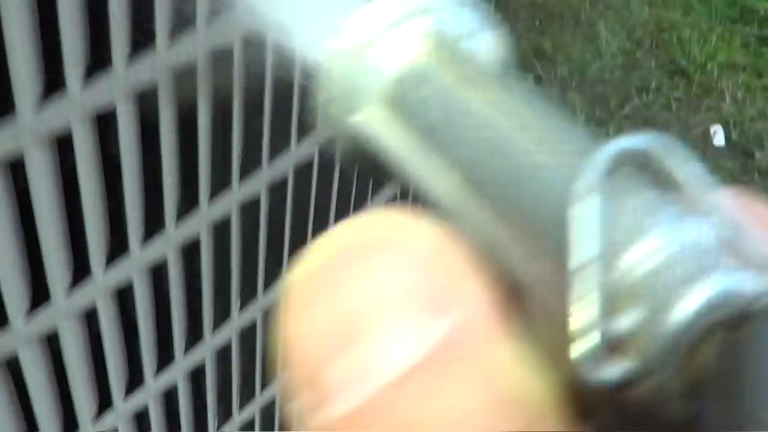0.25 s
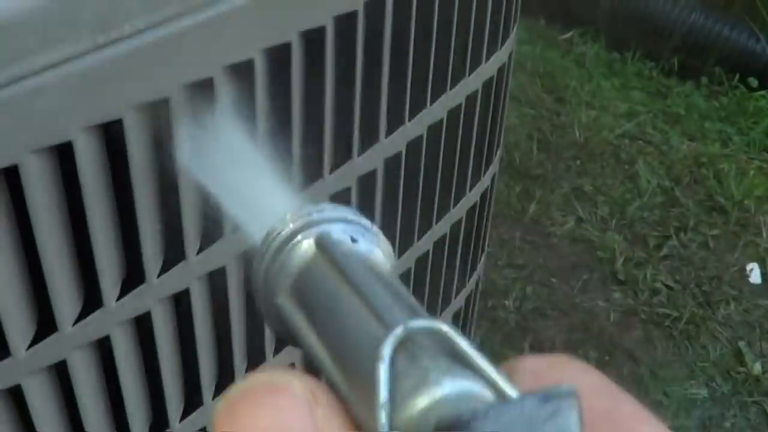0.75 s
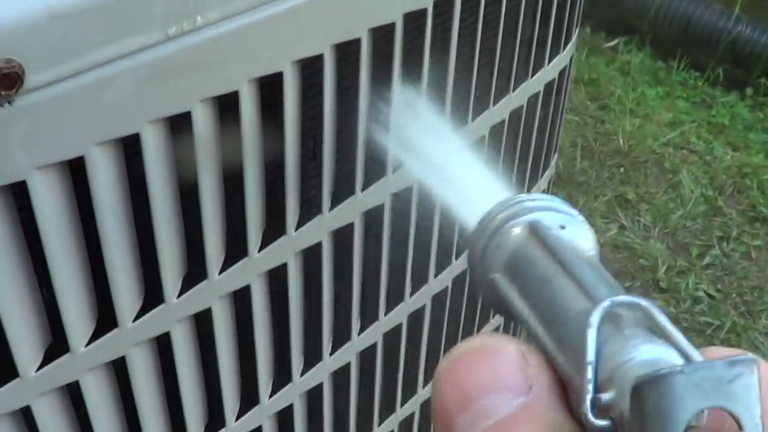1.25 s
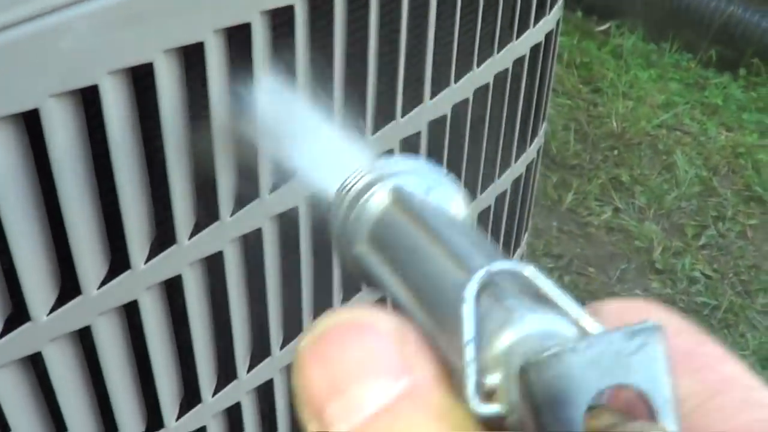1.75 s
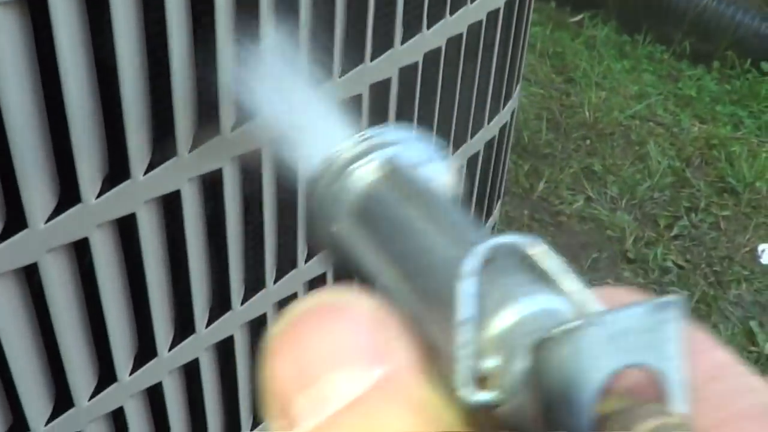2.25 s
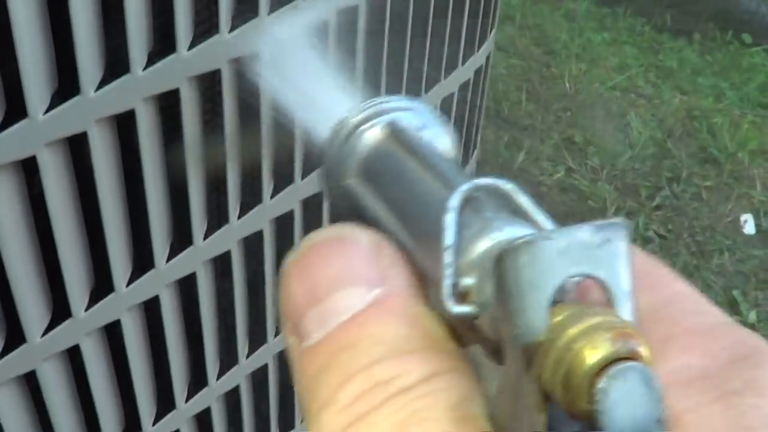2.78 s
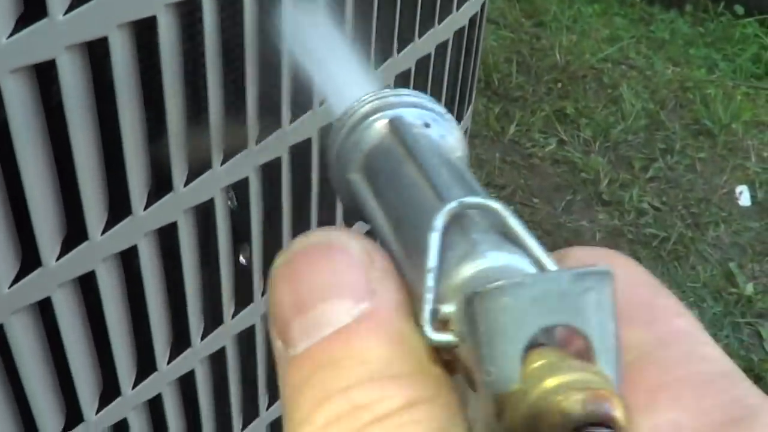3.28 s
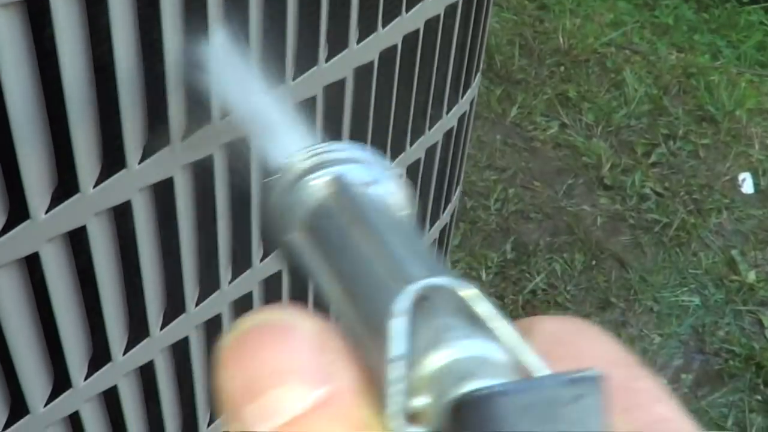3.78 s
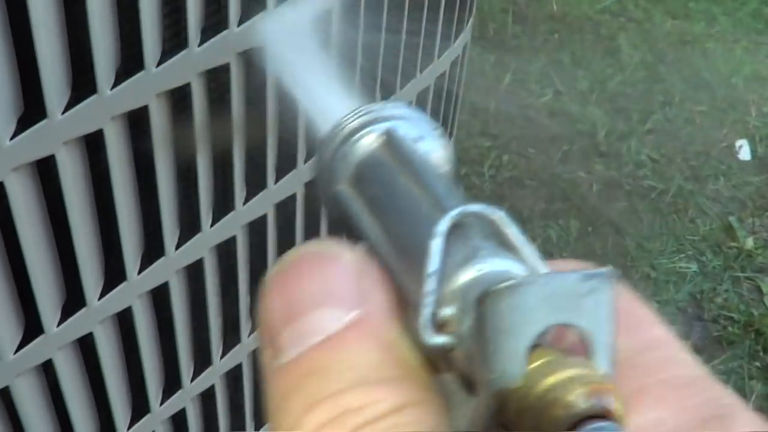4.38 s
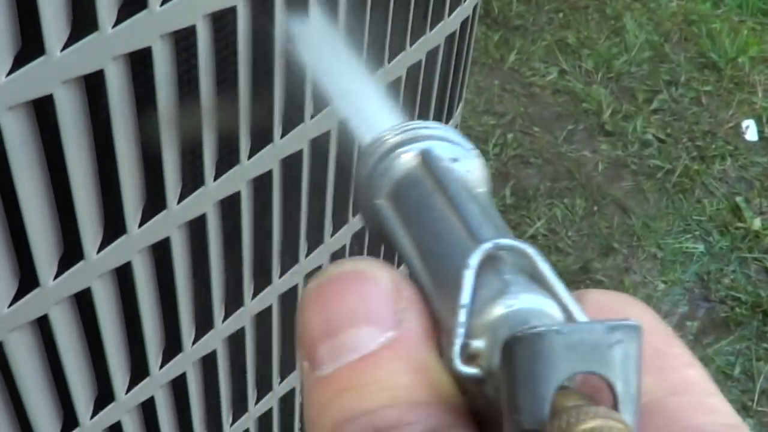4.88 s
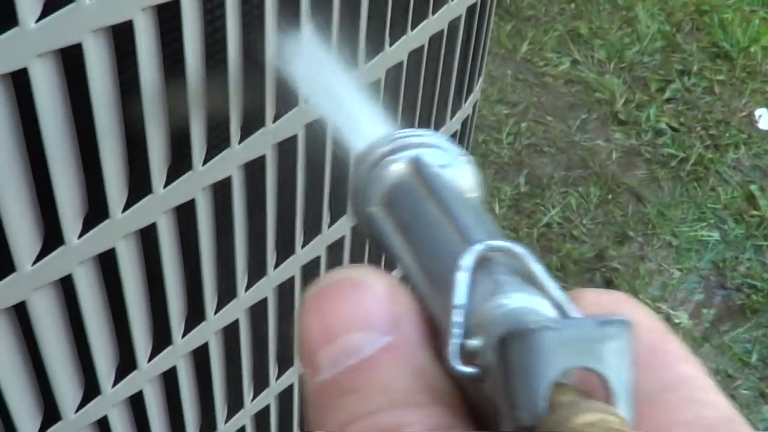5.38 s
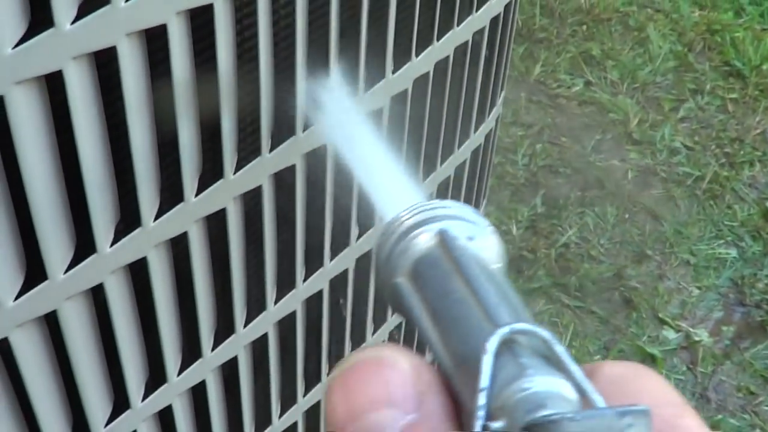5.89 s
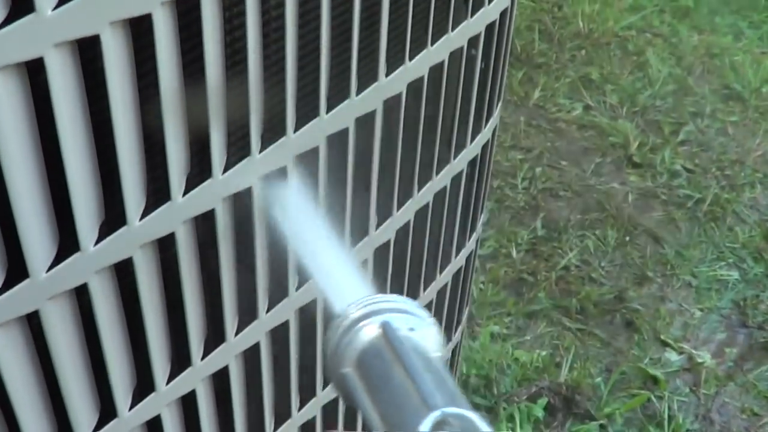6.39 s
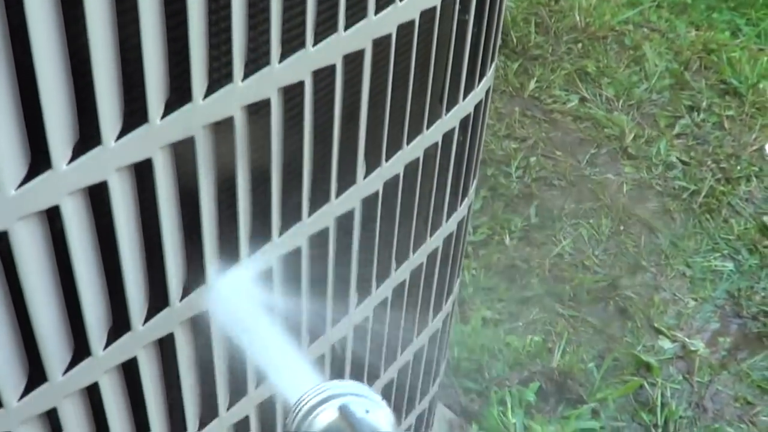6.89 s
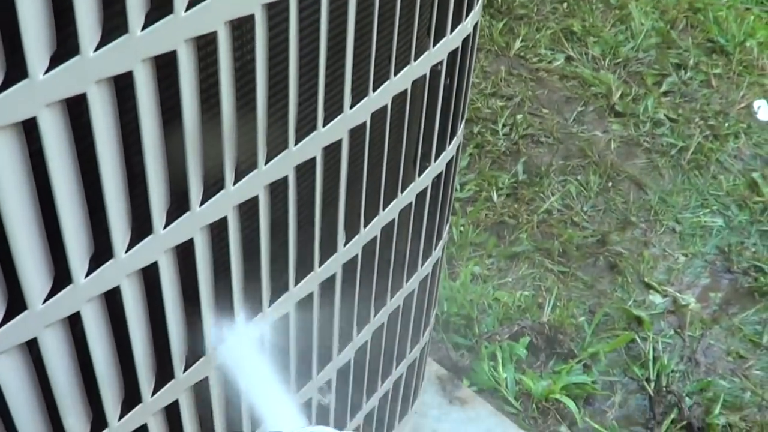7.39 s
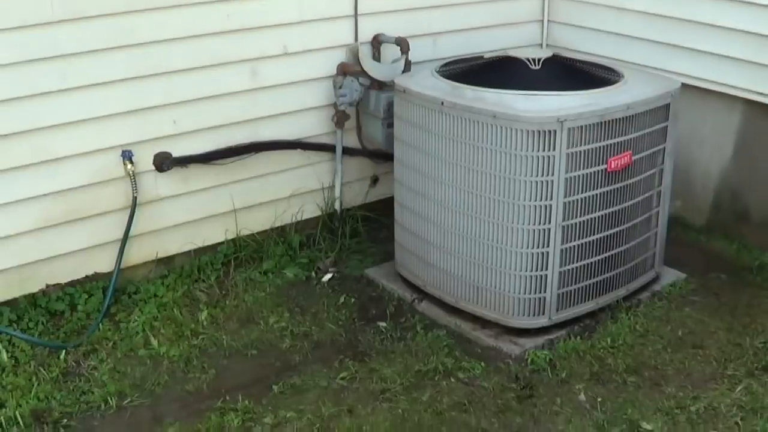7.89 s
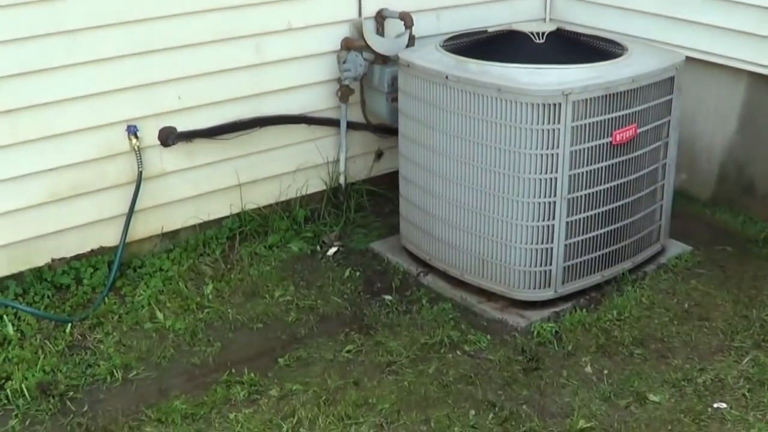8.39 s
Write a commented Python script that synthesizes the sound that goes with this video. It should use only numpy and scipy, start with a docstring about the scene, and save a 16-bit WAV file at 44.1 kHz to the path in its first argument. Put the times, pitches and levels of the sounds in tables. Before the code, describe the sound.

Very close to the microphone, a hose nozzle blasts water onto the metal louvres and fins of an outdoor air conditioner. The bright, dense hiss flutters, spits and changes colour as the aim moves, with hollow splashing and faint whistles beneath. It stops instantly near the end, replaced by a much quieter running unit a few steps away: compressor hum, fan rumble, thin hiss and a few drips.

```python
"""First, for 7.8 s, a close hose jet sweeps the louvres and coil fins of an outdoor air conditioner.
Random drop impacts merge into a hiss whose colour follows the aim; resonances add spits and faint drumming.
Then the scene cuts to a few steps away, where the unit runs: sines make the compressor and mains hum,
filtered noise the fan's rumble and a thin hiss. Soon the listener moves off and the upper sounds sink,
while a few drips, short resonant bursts, fall from the wet cabinet."""
import sys
import numpy as np
from scipy import signal
from scipy.fft import rfft, irfft, next_fast_len
from scipy.io import wavfile

SR = 44100
rng = np.random.default_rng(int(sys.argv[2]) if len(sys.argv) > 2 else 0)


def dump_mix(stems):
    """Bounce the given channels to the path in sys.argv[1] as a 16-bit WAV at rate SR."""
    frames = np.atleast_2d(stems).T  # one column per channel
    limited = np.clip(frames, -1, 1)  # hard clip at full scale
    pcm = np.round(limited * 32767).astype(np.int16)
    wavfile.write(sys.argv[1], SR, pcm)


N = 381465
TIME = np.arange(N) / SR   # s
CUT_S = 7.8                # from the spray to the running unit

# air moved by the fan, spectral shape: (frequency [Hz], relative density [dB per Hz])
FAN_SPECTRUM = [(30, -22), (55, -12), (90, -6), (140, -8.5), (210, -4), (350, -5.5), (520, -16),
                (700, -10.5), (830, -8.5), (1100, -8.5), (1330, -18), (2100, -13.5), (2900, -19.5),
                (5000, -40)]
# the unit's thin hiss, spectral shape: (frequency [Hz], relative density [dB per Hz])
THIN_SPECTRUM = [(1200, -27), (2200, -11), (2950, -14), (3500, -8), (4000, -5), (4500, -6.5), (5400, -2.5),
                 (6400, -2.5), (7300, -9), (8500, -15), (11000, -35)]
# fine top of that hiss, spectral shape: (frequency [Hz], relative density [dB per Hz])
FINE_SPECTRUM = [(5000, -25), (7800, -1.5), (9000, -3), (10700, -4), (11400, -7.5), (13000, -15),
                 (15600, -16.5)]
FAN_DB, THIN_DB, FINE_DB = -37.2, -32, -40   # rms levels at the first position
# compressor orders: (multiple of the shaft rate [1], level [dB rms])
COMPRESSOR_ORDERS = [(1, -58), (6, -56), (8, -58.5), (10, -61), (13, -55), (15, -44), (16, -51.5),
                     (17, -50.5), (21, -60)]
SHAFT_HZ = 59.25
# mains hum and fan blades: (frequency [Hz], level [dB rms])
HUM_TONES = [(119.9, -46), (166.7, -51)]
# drips off the wet cabinet: (time [s], length [s], centre [Hz], width [Hz], level [dB])
CABINET_DRIPS = [(8.106, .0035, 2100, 1000, -28), (8.454, .0025, 3300, 1300, -28),
                 (8.462, .0025, 2000, 900, -33), (8.504, .003, 1700, 900, -34)]
# the listener moves off; each upper sound sinks by its own amount
MOVE_S, MOVE_LENGTH_S = 8.1, 0.22
THIN_LOSS_DB, FINE_LOSS_DB, WHOOSH_LOSS_DB = 2.5, 5, 4
# a loose band in the thin hiss slides down from the cut on; its level is relative to that hiss
THIN_PEAK_HZ, THIN_SAG_HZ_PER_S, THIN_PEAK_DB = 5700, 1100, -7

# low drone under the spray: (time [s], level [dB])
DRONE_LEVEL = [(0, -72), (.9, -65), (1.8, -66), (2.6, -74), (3.3, -58.5), (4.2, -70), (4.9, -61),
               (5.7, -60), (7.1, -73)]
DRONE_HZ = 95.5
# the cabinet booms under the water: (time [s], length [s], centre [Hz], width [Hz], level [dB])
CABINET_BOOMS = [(.18, .086, 240, 35, -48.5), (.97, .11, 550, 54, -52), (2.83, .12, 339, 17, -56),
                 (2.91, .1, 168, 30, -56), (3.335, .027, 69.6, 41, -48), (3.41, .08, 240, 20, -53),
                 (3.52, 0.095, 269, 23, -52), (6.57, .08, 215, 35, -56), (6.8, .13, 245, 35, -58),
                 (7.62, .14, 127, 20, -58)]
# the jet catches an edge and spits: (time [s], length [s], centre [Hz], width [Hz], level [dB])
EDGE_SPITS = [(.125, .025, 1850, 400, -31.5), (.47, .07, 5900, 900, -24.5), (.55, .14, 480, 250, -46),
              (1.868, 0.017, 1820, 500, -27), (1.87, .05, 4230, 900, -24.5), (1.88, .06, 600, 400, -45),
              (2.36, .08, 4800, 700, -32), (2.49, .06, 6800, 250, -27), (2.96, .05, 4070, 400, -29),
              (4.48, .066, 7600, 200.3, -28), (4.95, .044, 5640, 900, -24), (6.85, .03, 2200, 501, -30)]
# a rib throws spray out sideways: (time [s], length [s], centre [Hz], width [Hz], level [dB])
SIDEWAYS_SPRAY = [(6.25, .07, 8800, 900, -34), (6.25, 0.055, 13000, 700, -36), (6.25, .06, 4800, 500, -47)]

# water on metal, low part, spectral shape: (frequency [Hz], relative density [dB per Hz])
SPLASH_SPECTRUM = [(30, -29), (60, -21), (130, -20.5), (175, -18), (300, -18), (520, -14.5), (640, -15),
                   (820, -9.5), (1170, -12), (1450, -5), (1700, 0), (2050, -0.5), (2550, -5.5),
                   (4200, -21.5)]
SPLASH_DB = -33
# ribs crossed by the jet: (time [s], length [s], rise of the splatter [dB], change of the ring [dB])
RIB_CROSSINGS = [(.54, .36, 4.5, 0), (1.867, 0.11, 5, 0), (2.8, .15, 4.5, 0.5), (3.78, 0.076, 5.5, -.5),
                 (4.404, .26, 6, -1.5), (4.92, 0.18, 2.5, 0.5), (6.218, 0.21, 5.2, -2.5),
                 (6.969, 0.11, 6.5, -1), (7.528, 0.14, 6.5, -.5)]
RIB_THUD_SHARE = .25           # share of the splatter's rise that reaches the low drumming
SLAT_HZ, SLAT_DB = 818, -62    # a slat's own note at rest; it rises with the splatter
# hollow ring behind the louvres: (time [s], level [dB])
RING_LEVEL = [(0, -36), (.13, -33), (.65, -34), (.9, -35), (4.1, -35), (4.95, -34.4), (6.65, -36),
              (6.85, -34), (7.8, -33)]
# louder whistles as the jet blows straight in: (time [s], length [s], pitch [Hz], rise [dB])
WHISTLE_SPELLS = [(.21, .1, 1748, 10), (.34, .13, 1816, 12.5), (.71, 0.094, 1725, 13),
                  (4.62, .15, 1700, 13), (4.96, .18, 1700, 10)]
WHISTLE_HZ, WHISTLE_DB = 1720, -15.5   # at rest; level relative to the ring

# water on metal, high part, spectral shape: (frequency [Hz], relative density [dB per Hz])
HISS_SPECTRUM = [(1500, -38.5), (2600, -14), (3000, -11), (3400, -7.5), (4600, -4.5), (6200, -2),
                 (6750, 0.5), (8800, 0.5), (9900, 1.1), (11000, -2), (11650, -4.5), (12700, -3.5),
                 (14200, -7.5), (15700, -14)]
# Of the next three curves the swells use only the movement about the mean.
# rush between the fins: (time [s], level relative to the hiss [dB])
RUSH_LEVEL = [(0, -6), (.3, -8), (.47, -4.8), (1.6, -4.5), (1.9, -4), (2.35, -4), (2.7, -6), (4.1, -3.8),
              (4.3, -8), (4.7, -5), (5.9, -6.5), (6.3, -8), (7.8, -8.5)]
# treble, the finest mist: (time [s], level relative to the hiss [dB])
MIST_LEVEL = [(0, -3.5), (.3, -4.8), (.85, -1.3), (1.65, -1.5), (2, -4), (4.15, -5), (6.3, -1), (7.8, -2.4)]
# gargle deep in the coil, before each layer's own share: (time [s], level [dB])
GARGLE_LEVEL = [(.08, -15), (.24, -20.5), (.6, -17), (1.45, -14), (2.9, -16.5), (5.9, -13.5), (6.2, -14.5),
                (7.8, -15.3)]
TOP_PER_MIST = .25   # dB per dB: the very top follows the mist
SIZZLE_PER_MIST, SIZZLE_PER_RUSH = -0.11, 0.11   # dB per dB: against the mist, with the rush
# as the nozzle is lowered towards the base, the core of the hiss grows and its top dulls
HISS_DB, LOWERING_S, LOWERED_CORE_DB, LOWERED_TOP_LOSS_DB = -17, 6.2, 2.5, 1.5

# scattered sound around the near spray: (frequency [Hz], side minus mid [dB])
NEAR_SCATTER = [(60, -20), (200, -32), (700, -21), (1250, -13.5), (2000, -17.5), (2700, -27.5),
                (4000, -34.5), (5400, -41), (6800, -17.5), (9000, -17), (10800, -28), (12200, -21),
                (13500, -26), (15000, -20)]
# scattered sound around the unit heard from afar: (frequency [Hz], side minus mid [dB])
FAR_SCATTER = [(120, -27), (300, -20), (520, -9), (900, -18), (1300, -7), (2100, -12), (3800, -6),
               (9000, -7.5), (14000, -20)]
# the two microphone ports: (frequency [Hz], left minus right [dB], left's phase lead [rad])
PORT_DIFFERENCES = [(300, -.3, -0.0011), (1200, 0.9, -0.096), (2500, 0.2, 0), (5800, -0.14, 0),
                    (6900, -1.6, 0.19), (7600, -1, 0.2), (8600, 2, 0.27), (9100, -0.3, .16),
                    (10500, 0.5, 0.054), (15000, -0.3, 0.12)]
CUTOFF_HZ = 15750


def from_db(db):
    """Logarithmic level: 20 dB is a factor of ten in amplitude."""
    return 10 ** (np.asarray(db) / 20)


def rms_one(x):
    """Normalisation: scale to unit rms."""
    return x / np.sqrt(np.mean(x ** 2) + 1e-20)


def in_time(rows):
    """Linear interpolation: each column of a curve table at every sample."""
    s, *columns = np.transpose(rows)
    return [np.interp(TIME, s, c) for c in columns]


def bump(s, length):
    """Gaussian envelope: a smooth rise to 1 and fall, centred on s."""
    return np.exp(-2 * ((TIME - s) / length) ** 2)


def filtered(x, gain_at):
    """Linear filtering: multiply the spectrum by a gain that depends on frequency."""
    size = next_fast_len(N + 4096)   # padding keeps the end from wrapping onto the start
    hz = np.maximum(np.fft.rfftfreq(size, 1 / SR), 1)
    return irfft(rfft(x, size) * gain_at(hz), size)[..., :N]


def coloured(x, points):
    """Spectral shaping: filter by a table of levels, interpolated over log frequency."""
    at, db = np.transpose(points)
    return filtered(x, lambda hz: from_db(np.interp(np.log(hz), np.log(at), db)))


def swell(x, db, centre_hz, octaves):
    """Band modulation: one region of the spectrum rises and falls as db moves about its mean."""
    region = filtered(x, lambda hz: np.exp(-(np.log2(hz / centre_hz) / octaves) ** 4))
    return x + region * (from_db(db - db.mean()) - 1)


def drift(rate_hz):
    """Low-passed random process: noise through two equal poles wanders slowly with spread 1."""
    step, settling = 40, 2000   # samples per slow value; slow values dropped at the start
    r = np.exp(-2 * np.pi * rate_hz * step / SR)
    white = rng.standard_normal(N // step + 2 + settling)
    slow = signal.lfilter([1], [1, -2 * r, r * r], white)[settling:]
    return np.interp(np.arange(N) / step, np.arange(len(slow)), rms_one(slow))


def resonance(x, hz, width_hz):
    """Damped oscillator: a two-pole resonance with gain 1 on top."""
    r = np.exp(-np.pi * width_hz / SR)
    zeros = np.array([1, 0, -1]) * (1 - r * r) / 2
    poles = [1, -2 * r * np.cos(2 * np.pi * hz / SR), r * r]
    return signal.lfilter(zeros, poles, x)


def tone(hz, waver_hz):
    """Frequency modulation: a sine of rms 1 whose pitch wanders a little."""
    cycles = np.cumsum(hz + waver_hz * drift(3)) / SR
    return np.sqrt(2) * np.sin(2 * np.pi * (cycles + rng.random()))


def narrow_band(hz, width_hz):
    """Quadrature modulation: two slow random parts make a narrow noise of rms 1 at a movable pitch."""
    phase = 2 * np.pi * np.cumsum(hz) / SR
    return drift(width_hz) * np.cos(phase) + drift(width_hz) * np.sin(phase)


def bursts(rows):
    """Noise-excited resonance: short swells of noise, each in a resonance of its own."""
    out = np.zeros(N)
    for s, length, hz, width_hz, db in rows:
        near = np.abs(TIME - s) < .5
        white = rng.standard_normal(N)[near]
        stage_hz = width_hz * 1.6   # two wider stages in a row narrow to about width_hz
        ringing = resonance(resonance(white, hz, stage_hz), hz, stage_hz)
        out[near] += from_db(db) * rms_one(ringing) * bump(s, length)[near]
    return out


def drops(per_s, spread_db, mist_db):
    """Shot noise: random impacts of uneven size over the smooth noise of the finest mist."""
    sizes = from_db(spread_db * np.minimum(rng.exponential(1, N), 4)) * rng.choice([-1, 1], N)
    impacts = sizes * (rng.random(N) < per_s / SR)
    return rms_one(rms_one(impacts) + from_db(mist_db) * rng.standard_normal(N))


def widen(mid, width):
    """Diffuse scattering: a decaying random tail forms the side signal, which differs at the two ports."""
    length = SR // 3
    scatter = rng.standard_normal(length) * np.exp(-np.linspace(0, 3, length))
    tail = signal.fftconvolve(mid, scatter / np.linalg.norm(scatter))[:N]
    side = coloured(tail, width)
    return np.array([mid + side, mid - side])


def fan_air():
    """Broadband flow noise: the fan's air is shaped random noise."""
    return from_db(FAN_DB) * rms_one(coloured(rng.standard_normal(N), FAN_SPECTRUM))


def thin_hiss(moved):
    """Shot noise and a gliding band: a thin hiss with a fine top, both sinking as the listener moves."""
    peak_hz = THIN_PEAK_HZ - THIN_SAG_HZ_PER_S * np.maximum(TIME - CUT_S, 0)
    thin = rms_one(coloured(drops(per_s=9000, spread_db=3.5, mist_db=1.0), THIN_SPECTRUM))
    thin = thin + from_db(THIN_PEAK_DB) * narrow_band(peak_hz, width_hz=300)
    thin_db = THIN_DB - THIN_LOSS_DB * moved + .5 * drift(20)
    fine = rms_one(coloured(drops(per_s=4800, spread_db=3.0, mist_db=1.5), FINE_SPECTRUM))
    return from_db(thin_db) * thin + from_db(FINE_DB - FINE_LOSS_DB * moved) * fine


def compressor():
    """Harmonic series: a rotating shaft sounds at whole multiples of its rate, wavering in level."""
    orders = sum(from_db(db) * tone(k * SHAFT_HZ, waver_hz=0.039 * k) for k, db in COMPRESSOR_ORDERS)
    return orders * from_db(0.82 * drift(4.4))


def running_unit():
    """Superposition: compressor orders and hum over the fan's air, a thin hiss and a few drips."""
    moved = np.clip((TIME - MOVE_S) / MOVE_LENGTH_S, 0, 1)
    hum = sum(from_db(db) * tone(hz, waver_hz=0.34) for hz, db in HUM_TONES)
    noise = swell(fan_air() + thin_hiss(moved), -WHOOSH_LOSS_DB * moved, centre_hz=2420, octaves=0.5)
    return widen(compressor() + hum + noise + bursts(CABINET_DRIPS), FAR_SCATTER)


def drone():
    """Amplitude modulation: a low, slightly wavering sine follows a level curve."""
    level_db, = in_time(DRONE_LEVEL)
    return from_db(level_db) * tone(DRONE_HZ, waver_hz=0.83)


def hollow_whistle():
    """Cavity resonance: a narrow note of the hollow, pulled in pitch during each louder spell."""
    hz = WHISTLE_HZ + sum((pitch - WHISTLE_HZ) * bump(s, length) for s, length, pitch, _ in WHISTLE_SPELLS)
    rise_db = sum(db * bump(s, length) for s, length, _, db in WHISTLE_SPELLS)
    return from_db(WHISTLE_DB + rise_db) * narrow_band(hz, width_hz=15)


def slat_echoes(x, strength, sway, count):
    """Comb filtering: weak reflections from nearby slats; paths sway with the hand, so ripples wander."""
    hand, out = drift(0.68), x
    for k, delay_s in enumerate(np.geomspace(.0009, .007, count)):
        path_s = delay_s * rng.uniform(.85, 1.15) + sway * (hand + .5 * drift(1.05))
        out = out + (-1) ** k * strength * np.interp(TIME - path_s, TIME, x)
    return rms_one(out)


def louvre_splash(sputter):
    """Impact excitation: larger drops sound the slats and the hollow behind; each rib adds splatter."""
    (ring_db,), (gargle_db,) = in_time(RING_LEVEL), in_time(GARGLE_LEVEL)
    slat_db = sum(db * bump(s, length) for s, length, db, _ in RIB_CROSSINGS)
    ring_db = ring_db + sum(db * bump(s, length) for s, length, _, db in RIB_CROSSINGS)
    x = coloured(drops(per_s=6000, spread_db=3.5, mist_db=-2.5), SPLASH_SPECTRUM)
    x = slat_echoes(x, strength=.07, sway=0.00028, count=7)
    x = swell(x, ring_db + 1.06 * drift(20), centre_hz=1850, octaves=0.6)
    x = swell(x, slat_db + 0.96 * drift(25), centre_hz=830, octaves=0.46)
    x = swell(x, RIB_THUD_SHARE * slat_db, centre_hz=330, octaves=0.74)
    x = swell(x, 0.74 * gargle_db + 0.67 * drift(25), centre_hz=2750, octaves=0.39)
    slat_note = from_db(SLAT_DB + slat_db) * narrow_band(np.full(N, SLAT_HZ), width_hz=13)
    whistle = from_db(ring_db) * hollow_whistle()
    return (from_db(SPLASH_DB) * x + slat_note + whistle) * from_db(0.67 * sputter)


def fin_hiss(sputter):
    """Shot noise: small fast drops shatter on the fins; the aim trades deeper rush against fine mist."""
    (rush_db,), (mist_db,), (gargle_db,) = in_time(RUSH_LEVEL), in_time(MIST_LEVEL), in_time(GARGLE_LEVEL)
    lowered = np.clip((TIME - LOWERING_S) / (CUT_S - LOWERING_S), 0, 1)
    top_db = TOP_PER_MIST * mist_db - LOWERED_TOP_LOSS_DB * lowered
    sizzle_db = SIZZLE_PER_MIST * mist_db + SIZZLE_PER_RUSH * rush_db
    x = coloured(drops(per_s=20000, spread_db=2.5, mist_db=2.0), HISS_SPECTRUM)
    x = slat_echoes(x, strength=0.088, sway=.0002, count=7)
    x = swell(x, LOWERED_CORE_DB * lowered, centre_hz=8200, octaves=0.21)
    x = swell(x, top_db + .5 * drift(3), centre_hz=14500, octaves=.2)
    x = swell(x, mist_db + 0.56 * drift(15), centre_hz=11300, octaves=0.19)
    x = swell(x, sizzle_db + 0.55 * drift(16), centre_hz=6370, octaves=0.2)
    x = swell(x, rush_db + 0.75 * drift(24) + 0.3 * sputter, centre_hz=4330, octaves=0.45)
    x = swell(x, 0.85 * gargle_db + 1.24 * drift(28), centre_hz=2820, octaves=0.37)
    return x * from_db(HISS_DB + 0.22 * sputter + 0.58 * drift(60))


def spraying():
    """Common modulation: the jet breaks up unevenly, so its hiss and splash flutter together."""
    sputter = drift(26)
    water = fin_hiss(sputter) + louvre_splash(sputter) + bursts(EDGE_SPITS)
    ahead = water + bursts(CABINET_BOOMS) + drone()
    # sound from the side meets the two ports out of step: opposite signs
    return widen(ahead, NEAR_SCATTER) + bursts(SIDEWAYS_SPRAY) * [[1], [-1]]


def scene():
    """Succession: the spray stops dead at the cut and the running unit fades in within 0.03 s."""
    before = np.exp(-np.maximum(TIME - CUT_S + 0.00068, 0) / .0011)
    after = np.clip((TIME - CUT_S) / 0.03, 0, 1) ** 1.4
    return spraying() * before + running_unit() * after


def record(dry):
    """Stereo reception: the ports differ a little in level and phase; the top is cut steeply."""
    at, lean_db, lead = np.transpose(PORT_DIFFERENCES)
    halves = np.array([[.5], [-.5]])   # each port takes half of the difference

    def port_gain(hz):
        """Complex response: level and phase of both ports."""
        level = from_db(halves * np.interp(hz, at, lean_db))
        return level * np.exp(1j * halves * np.interp(hz, at, lead))

    heard = filtered(dry, port_gain)
    return filtered(heard, lambda hz: np.clip((CUTOFF_HZ - hz) / 100 + .5, 0, 1))


dry = scene()
out = record(dry)
dump_mix(out)
```